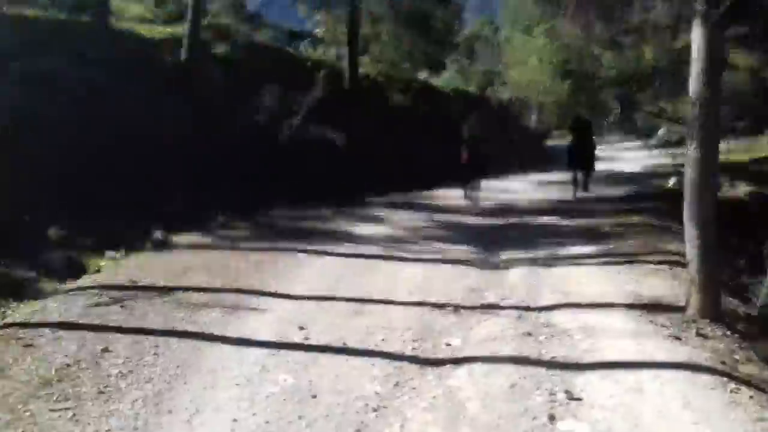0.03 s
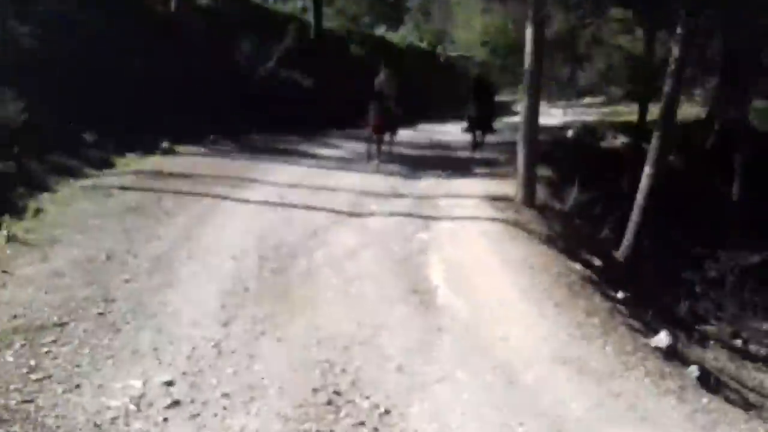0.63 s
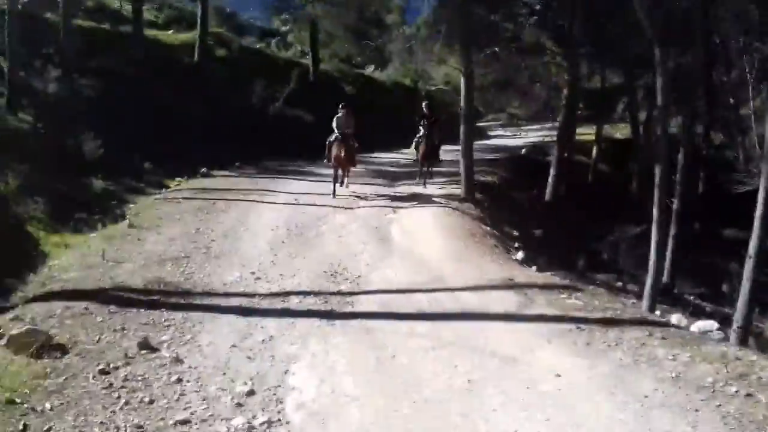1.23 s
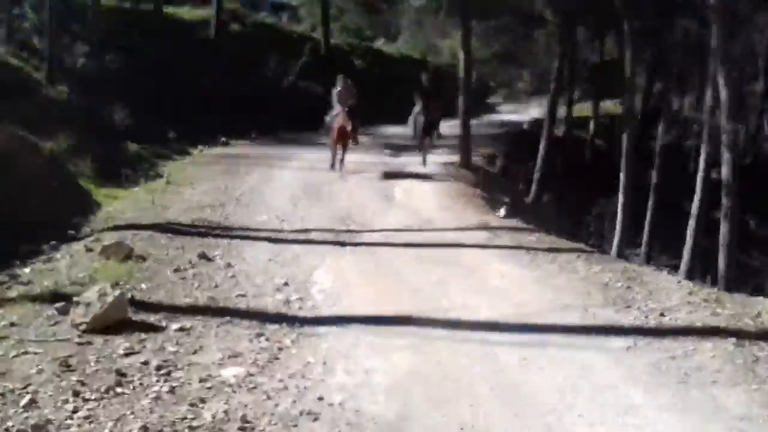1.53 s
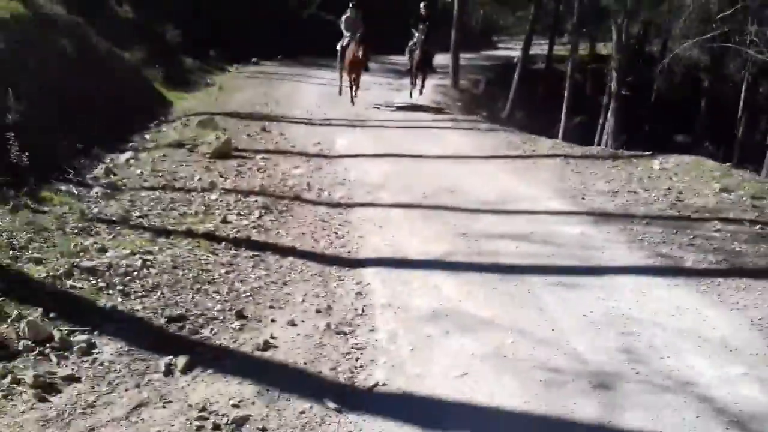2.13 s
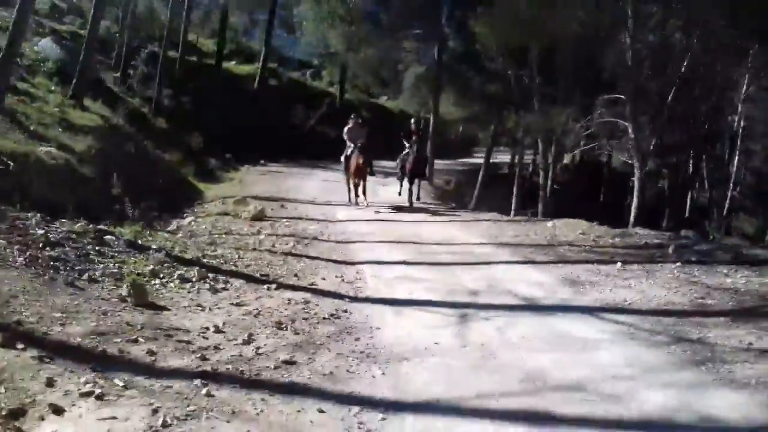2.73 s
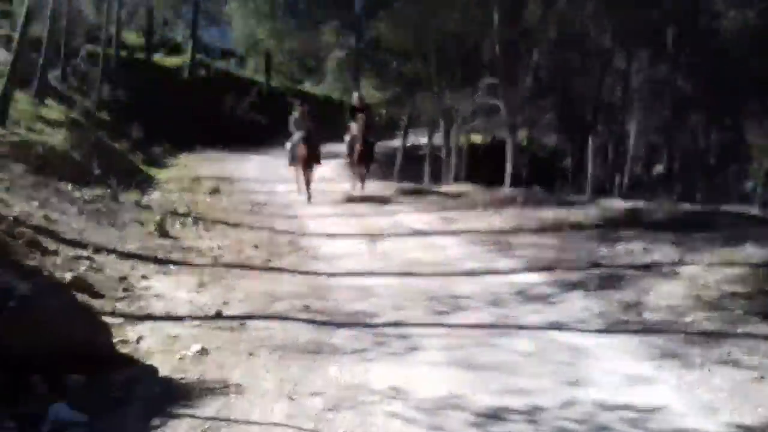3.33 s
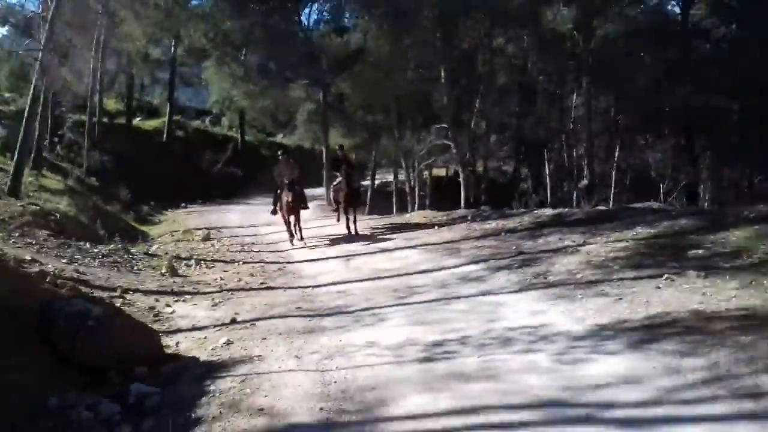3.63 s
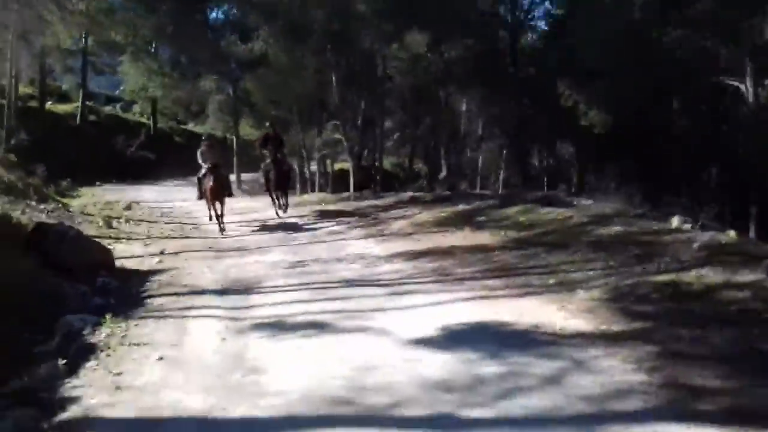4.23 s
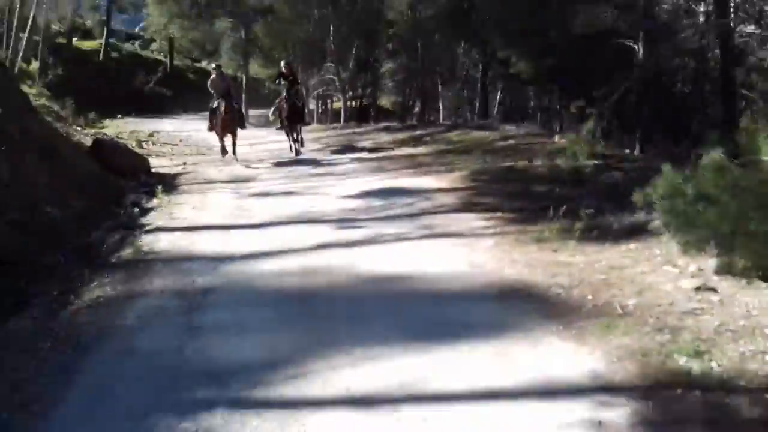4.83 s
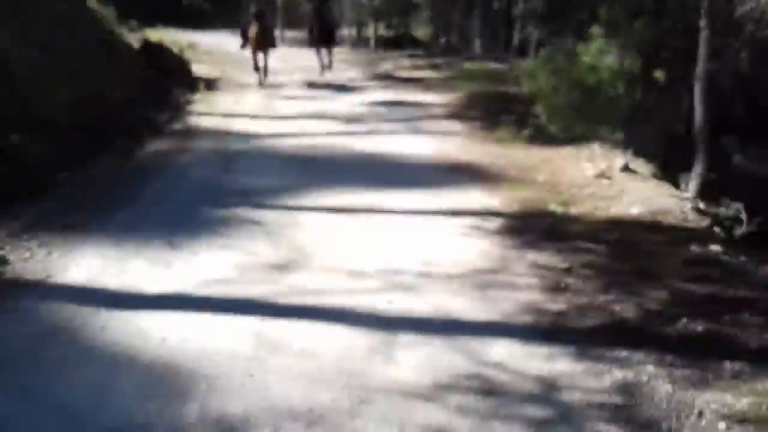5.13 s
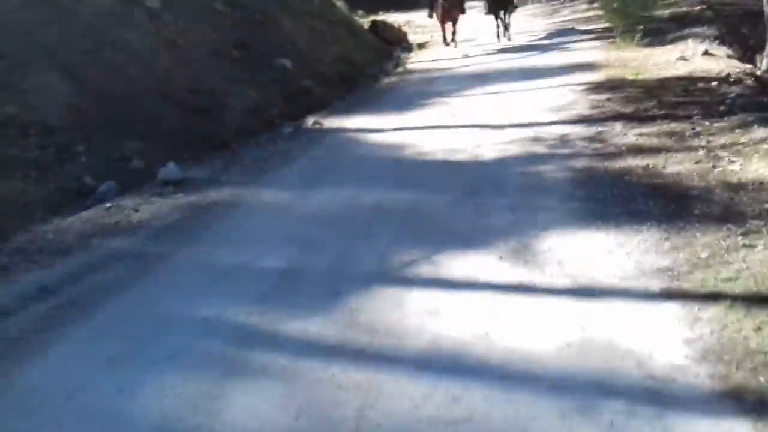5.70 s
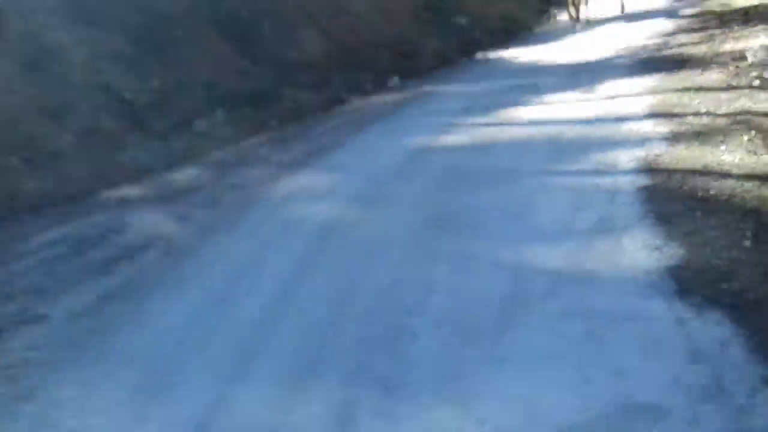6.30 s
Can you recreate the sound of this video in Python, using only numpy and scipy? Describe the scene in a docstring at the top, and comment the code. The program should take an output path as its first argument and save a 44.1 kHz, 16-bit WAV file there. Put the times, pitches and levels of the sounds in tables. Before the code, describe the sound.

Rapid, hollow hoofbeats run from start to finish as horses gallop over gravel, with a faint echo from the surrounding trees. Each stride brings a spray of grit, ticking pebbles and sometimes a brief sandy skid. The microphone rides on the leading horse, picking up low wind rumble, short buffets and a few close clicks. The wind drops near the end while the gallop continues.

```python
"""Gallop on a forest track

Horses on gravel, heard from the saddle of the one in front. Each hoof knocks twice, toe and heel;
some crunch into grit or skid on sand. Every stride throws up gravel, and the trees echo faintly.
The wind of the ride rumbles on the microphone and buffets it with the strides."""
import sys
import numpy as np
from scipy import signal
from scipy.fft import rfft, irfft
from scipy.io import wavfile
from scipy.ndimage import uniform_filter1d, minimum_filter1d

SR = 44100
rng = np.random.default_rng(int(sys.argv[2]) if len(sys.argv) > 2 else 0)


def transcribe(signal):
    """Save signal, clipped to [-1, 1], as a 16-bit WAV file at the path in sys.argv[1]."""
    frames = np.atleast_2d(signal).T
    limited = np.clip(frames, -1, 1)
    pcm = np.round(limited * 32767).astype(np.int16)
    wavfile.write(sys.argv[1], SR, pcm)


N = 289296
TIME_S = np.arange(N) / SR

# Airflow, following the speed of the ride. Each row: time in seconds, relative level in dB.
AIRFLOW = [(0.0, -30), (0.13, -30.5), (2.32, -29.5), (2.89, -30.5), (3.03, -36.5), (3.18, -31.5),
           (3.47, -39.5), (3.91, -32.5), (4.07, -27.5), (4.43, -28), (4.49, -36), (4.55, -27.5),
           (4.97, -20.5), (5.085, -34.5), (5.2, -23), (5.37, -34.5), (5.61, -38), (6.56, -35.5)]
# Gravel sprays, one a stride. Each row: peak time in seconds, level in dB.
SPRAYS = [(.27, -40), (.779, -33), (1.172, -34.5), (1.6, -34.5), (2.071, -35), (2.499, -36.5),
          (2.95, -33.5), (3.35, -35.5), (3.772, -37), (4.23, -37), (4.679, -32.5), (5.14, -37),
          (5.56, -41.5), (5.983, -46), (6.42, -41.5)]
# Stones rolling between sprays. Each row: time in seconds, level in dB.
ROLLING = [(0, -42), (1.3, -42.5), (3.2, -48.5), (4.4, -49), (5.5, -62.5), (6.56, -43.5)]
# Flung stones. Each row: start in seconds, relative level in dB.
PEBBLES = [(0.025, -39.5), (0.137, -29.5), (0.314, -32), (0.34, -40), (0.716, -38.5), (0.865, -33.5),
           (1.285, -39), (1.314, -41), (1.553, -34), (1.626, -40), (1.654, -31), (2.616, -39), (2.752, -38),
           (2.805, -37.5), (2.917, -29), (2.946, -25), (3.084, -34), (3.151, -42), (3.308, -34),
           (3.357, -33), (3.395, -36), (3.514, -39.5), (3.738, -37), (4.173, -34.5), (4.429, -40),
           (4.562, -35.5), (5.006, -34.5), (5.035, -40), (5.297, -38), (5.528, -35), (5.584, -40),
           (5.677, -42.5), (5.873, -42), (5.938, -42), (6.012, -42.5), (6.082, -41), (6.127, -40.5),
           (6.307, -35), (6.408, -33), (6.44, -39)]
# Hoof landings. Each row: start in seconds, relative level in dB, pitch in Hz, ground hardness in dB,
# delay of the lighter edge in seconds (negative if it lands first).
HOOF_FALLS = [(0.057, -24, 1850, 0.5, 0.0064), (0.175, -13.5, 1036, -8, -0.0017),
              (0.2655, -20, 1040, -4, -0.0031), (0.2878, -22.0, 1150, -25, 0.0054),
              (0.4902, -23.0, 1470, -2, -0.00028), (0.577, -24, 1840, -4.5, -0.001),
              (0.621, -17, 1070, -6.5, -0.0021), (0.7059, -21, 1010, -4.5, 0.015),
              (0.9375, -12, 1156, -7, -0.00074), (1.0237, -25.5, 1700, -9, 0.0053),
              (1.059, -15.0, 1040, -5.5, 0.0021), (1.1506, -22, 1100, -3, 0.0017),
              (1.3862, -17.5, 1070, -6, 0.0014), (1.473, -25.0, 1530, -0.5, 0.0053),
              (1.5106, -13, 1276, -12, 0.00097), (1.5985, -19.5, 800, -7, 0.0024),
              (1.6758, -22, 1200, -18, 0.0012), (1.826, -15, 1120, -8, -0.0028),
              (1.9171, -26, 664, 1, 0.0036), (1.9551, -14.5, 1135, -6.0, -0.0022),
              (2.048, -17.5, 960, -5.5, -0.0096), (2.266, -18.5, 1115, -5, 0.0029),
              (2.3648, -23.5, 796, 4, -0.0068), (2.3886, -19.5, 1220, 0.5, -0.00027),
              (2.48, -25, 720, 2, -0.0019), (2.5142, -21.5, 1110, -2.5, -0.0035),
              (2.73, -10.5, 1130, -13.5, 0.00014), (2.817, -20.5, 1530, -7.5, -0.0044),
              (2.8511, -16, 956, -6.5, -0.0041), (3.0619, -20.5, 1044, -5.5, 0.007),
              (3.1832, -15.0, 1220, -10.5, -0.003), (3.2717, -21.0, 1550, -6.5, 0.0031),
              (3.298, -8, 1110, -13, 0.0000035), (3.3999, -19.5, 980, -9.5, -0.0041),
              (3.4227, -19, 1040, -12, 0.0062), (3.6399, -16, 1164, -15.5, 0.002),
              (3.684, -32.5, 1170, 2.5, 0.011), (3.728, -19.5, 1590, -15, 0.0066),
              (3.7605, -16.5, 1000, -11.5, -0.0002), (4.0861, -21, 1150, -5, -0.0017),
              (4.2132, -16, 1145, -12.5, 0.0028), (4.2967, -19.5, 1007, -12, 0.0039),
              (4.529, -18.5, 1080, -6, -0.0013), (4.6077, -20.5, 1730, -3.5, 0.0018),
              (4.6519, -15.5, 1265, -4.5, 0.0011), (4.7435, -17, 1170, -12, 0.0018),
              (4.7736, -18, 700, -7, -0.0042), (4.9698, -18, 903, -9, -0.0056),
              (5.05, -22.5, 1330, -7, -0.00081), (5.0845, -14, 1220, -10, 0.0033),
              (5.181, -17, 1100, -13, 0.000038), (5.1989, -21.5, 1170, -9.5, 0.0029),
              (5.3088, -21, 1080, -9, -0.0054), (5.3505, -24.5, 633, -21, 0.0038),
              (5.4097, -18.0, 1150, -11.5, -0.0019), (5.4941, -18, 975, -9, -0.0048),
              (5.5438, -13.5, 900, -10.5, 0.00026), (5.6255, -24.5, 1170, -8.5, 0.0045),
              (5.8426, -17.5, 1405, -16.5, 0.0025), (5.9282, -22, 1060, -7.5, -0.0077),
              (5.9701, -21.5, 900, -2.5, -0.0036), (6.0508, -27, 1130, -9.5, -0.002),
              (6.2648, -19.0, 1590, -5, 0.0014), (6.3374, -17.0, 1535, -19, 0.0047),
              (6.3829, -16.0, 920, -4, 0.00063), (6.4638, -22.5, 746, -2.5, -0.0013),
              (6.4839, -10, 1050, -9.5, 0.0039), (6.5565, -22.5, 1000, -4, 0.0013)]
# Hoof wall modes. Each row: frequency in Hz, relative level in dB.
WALL_MODES = [(1650, 5.5), (2050, 7), (2400, -10)]
# Hooves biting into grit. Each row: start in seconds, relative level in dB.
BITES = [(0.173, -27), (1.06, -30), (1.149, -24), (1.957, -24), (2.044, -30), (2.156, -26), (2.365, -26.5),
         (2.479, -21.5), (2.816, -30), (2.852, -26.5), (3.304, -24), (3.355, -31.5), (3.851, -25),
         (4.213, -25), (4.297, -32), (4.744, -27.5), (4.966, -33.5), (5.085, -26), (6.336, -35)]
# Close clicks. Each row: start in seconds, dry peak in dB.
CLICKS = [(.18, -8), (0.449, -9.5), (1.352, -21), (5.086, -4.5)]
# Air blasts. Each row: start in seconds, length in seconds, relative level in dB, centre in Hz.
BUFFETS = [(0.22, 0.014, -27.5, 297), (0.309, 0.019, -21.5, 557), (0.612, 0.018, -21, 563),
           (0.648, 0.04, -25.5, 394), (0.861, 0.02, -26, 410), (1.1, 0.0041, -22, 520),
           (1.372, 0.031, -29, 325), (1.453, 0.022, -26, 454), (1.646, 0.0094, -25.5, 470),
           (1.755, 0.024, -21, 166), (1.902, 0.029, -23, 308), (2.361, 0.033, -25, 477),
           (2.501, 0.031, -22, 400), (2.553, 0.012, -23, 292), (2.894, 0.01, -20.5, 313),
           (2.92, 0.04, -19.5, 520), (2.969, 0.019, -23, 250), (3.047, 0.016, -26, 266),
           (3.121, 0.053, -27, 194), (3.138, 0.037, -25.5, 530), (3.432, 0.016, -26.5, 274),
           (3.835, 0.0069, -29, 353), (3.978, 0.024, -25.5, 231), (4.059, 0.025, -24.5, 493),
           (4.126, 0.0038, -22.5, 596), (4.158, 0.011, -25.5, 550), (4.318, 0.03, -22.5, 290),
           (4.358, 0.046, -20.5, 370), (4.54, 0.034, -20, 378), (4.701, 0.028, -28, 200),
           (4.871, 0.0076, -17.5, 455), (4.88, 0.021, -21.5, 427), (4.921, .03, -31, 500),
           (4.963, 0.012, -17, 396), (5.037, 0.0037, -22.5, 440), (5.136, 0.021, -24.5, 586),
           (5.695, 0.011, -36, 450), (5.972, 0.037, -29.5, 202), (6.111, 0.045, -29.5, 186)]
# Skidding hooves. Each row: start in seconds, level in dB.
SKIDS = [(1.52, -42.5), (2.384, -41), (2.497, -41), (3.066, -34), (3.301, -34), (3.395, -35.5),
         (3.858, -40), (4.67, -38.5)]
# Source spectra. Each row: frequency in Hz, relative density in dB.
HISS_SPECTRUM = [(1000, -7), (3200, -6.5), (3900, 3.5), (5000, -20), (9000, -15), (15000, -9.5)]
RUMBLE_SPECTRUM = [(20, -38), (45, -16), (90, 10), (140, 13), (270, 10), (450, 2), (800, -14),
                   (1500, -30.5), (3500, -43), (9000, -56)]
BLAST_SPECTRUM = [(40, -34.5), (130, 2), (320, 17), (540, 15), (950, 6.5), (1600, -6), (3500, -33.5),
                  (9000, -58.5)]
GRIT_SPECTRUM = [(300, -27.5), (700, -1), (1150, 5), (1600, -4), (2200, -4), (3100, -1), (4000, -4.5),
                 (6000, -14), (9000, -23), (15000, -36)]
SAND_SPECTRUM = [(1500, -20), (4500, -2.5), (7200, -0.5), (15000, -15.5)]
# Echo decay of trees and bank. Each row: frequency in Hz, T60 in seconds.
FOREST_T60 = [(300, 0.29), (1200, 0.035), (4000, 0.91), (10000, 0.078)]
# Small microphone. Each row: frequency in Hz, gain in dB.
MIC_RESPONSE = [(15, -37.5), (50, -1), (2400, 2), (3200, -7), (4050, -6.5), (5000, -18.5), (7000, -22.5),
                (10000, -30.5), (15000, -28.5)]


def amp(db):
    return 10 ** (np.asarray(db) / 20)


def unit(x):
    """Scale to rms 1."""
    return x / np.sqrt(np.mean(x ** 2) + 1e-20)


def unit_energy(x):
    """Scale to the energy of 10 ms at rms 1."""
    return x / np.sqrt(np.sum(x ** 2) / (SR // 100))


def at_hz(table, hz):
    """Interpolate over log frequency."""
    table_hz, value = np.transpose(table)
    return np.interp(np.log(hz + 1), np.log(table_hz), value)


def follow(curve):
    """dB curve to gain per sample."""
    return amp(np.interp(TIME_S, *np.transpose(curve)))


def add(mix, start_s, sound):
    part = mix[max(round(start_s * SR), 0):][:len(sound)]
    part += sound[:len(part)]


def colour(x, spectrum, shift=1, size=4096):
    """Minimum-phase filter; shift multiplies the spectrum's frequencies."""
    hz = abs(np.fft.fftfreq(size, 1 / SR))
    log_gain = np.log(amp(at_hz(spectrum, hz / shift)))
    taps = np.fft.ifft(np.exp(signal.hilbert(log_gain).conj())).real[:size // 2]
    return signal.fftconvolve(x, taps)[:len(x)]


def wander(rate_hz):
    """Smooth noise at rms 1, rolled off above rate_hz."""
    hz = np.fft.rfftfreq(N, 1 / SR)
    return unit(irfft(rfft(rng.standard_normal(N)) * np.exp(-(hz / rate_hz) ** 2), N))


def grains(per_s, spread_db):
    """Random impulses, many small, a few large."""
    sizes = amp(spread_db * np.minimum(rng.exponential(1, N), 4))
    return unit(sizes * rng.choice([-1, 1], N) * (rng.random(N) < per_s / SR))


def hiss(level_db=-53):
    """Faint steady hiss."""
    return amp(level_db) * unit(colour(rng.standard_normal(N), HISS_SPECTRUM))


def wind_rumble(gain_db=4, gust_db=1, lump_db=5, flutter_db=-4):
    """Eddies pass the microphone in lumps; brighter flutter grows with the airflow."""
    flow = follow(AIRFLOW) * amp(gust_db * wander(rate_hz=17))
    eddies = unit(colour(rng.standard_normal(N), RUMBLE_SPECTRUM) * amp(lump_db * wander(rate_hz=123)))
    flutter = unit(colour(grains(per_s=320, spread_db=2.5), BLAST_SPECTRUM, shift=1.1))
    return flow * (amp(gain_db) * eddies + amp(flutter_db) * flutter)


def gravel(rise_db_per_s=168, settle_db_per_s=62.5, ticks_db=-5, sand_db=-13, patch_db=6):
    """Each stride throws gravel that patters down and rolls on, with single ticks and patches of sand."""
    power = follow(ROLLING) ** 2
    for peak_s, db in SPRAYS:
        drop_db = np.maximum(rise_db_per_s * (peak_s - TIME_S), settle_db_per_s * (TIME_S - peak_s))
        power += amp(db - drop_db) ** 2
    coarse = unit(colour(grains(per_s=9000, spread_db=3.5), GRIT_SPECTRUM))
    coarse *= amp(2.5 * wander(rate_hz=90))
    ticks = unit(colour(grains(per_s=80, spread_db=2), GRIT_SPECTRUM, shift=1.3))
    sand = unit(colour(grains(per_s=1400, spread_db=2.5), GRIT_SPECTRUM, shift=1.95))
    sand *= amp(sand_db + patch_db * np.tanh(wander(rate_hz=25)))
    return (coarse + amp(ticks_db) * ticks + sand) * np.sqrt(power)


def pebbles(gain_db=3, decay_s=0.0011, centre_hz=2700):
    """Flung stones land with a dry tick, each at its own pitch."""
    out, t = np.zeros(N), np.arange(SR // 50) / SR
    for start_s, db in PEBBLES:
        tick = colour(rng.standard_normal(len(t)) * np.exp(-t / decay_s), GRIT_SPECTRUM)
        resonance = signal.iirpeak(centre_hz * rng.uniform(.7, 1.35), Q=1.5, fs=SR)
        add(out, start_s, amp(db + gain_db) * unit_energy(signal.lfilter(*resonance, tick)))
    return out


def forest_echo(x, level_db=-21, reflections=1500):
    """Trunks and bank scatter the sound; decay time varies with frequency."""
    taps = np.zeros(SR // 2)
    taps[rng.integers(SR // 150, len(taps), reflections)] = rng.standard_normal(reflections)
    hz, t, spectra = signal.stft(taps, SR, nperseg=256)
    decay = amp(-60 * t / at_hz(FOREST_T60, hz)[:, None])
    tail = signal.istft(spectra * decay, SR, nperseg=256)[1]
    return amp(level_db) * signal.fftconvolve(x, tail / np.linalg.norm(tail))[:N]


def clop(t, hz, swell_cycles=1.294, rebound=0.36, rebound_s=0.004):
    """Air trapped under the sole swells into a hollow note, and again faintly as the hoof settles."""
    swell_s = swell_cycles / hz
    onsets_s = np.array([[0], [rebound_s * rng.uniform(.6, 1.4)]])
    age = np.maximum(t - onsets_s, 0) / swell_s
    first, second = (age * np.exp(1 - age)) ** 3 * np.cos(2 * np.pi * hz * (t - swell_s))
    return unit_energy(first + rebound * second)


def hoof_edge(t, hz, hard_db, wall_db=-1, wall_t60_s=0.016, shoe_db=-7, shoe_hz=3850,
              scuff=0.11, scuff_s=0.0063, crack_db=-10, crack_s=0.0022):
    """One edge lands: sole clops, dirt cracks; on hard ground the wall rings and the iron shoe ticks."""
    force = scuff * rng.standard_normal(len(t)) * np.exp(-t / scuff_s)
    force[SR // 1400] += 1  # impact
    mode_hz, mode_db = np.transpose(WALL_MODES)[..., None]
    vary_db = rng.normal(0, 3, mode_hz.shape)
    detune = rng.normal(1, .06, mode_hz.shape)
    modes = amp(mode_db + vary_db - 60 * t / wall_t60_s) * np.cos(2 * np.pi * mode_hz * detune * t)
    wall = unit_energy(signal.fftconvolve(force, modes.sum(0))[:len(t)])
    shoe_resonance = signal.iirpeak(shoe_hz * np.sqrt(detune[0, 0]), Q=6, fs=SR)
    shoe = unit_energy(signal.lfilter(*shoe_resonance, force))
    crack = unit_energy(colour(rng.standard_normal(len(t)) * np.exp(-t / crack_s), GRIT_SPECTRUM))
    ring = amp(wall_db) * wall + amp(shoe_db) * shoe
    return clop(t, hz) + amp(crack_db) * crack + amp(hard_db) * ring


def hoof_knocks(gain_db=-2.51, light_ratio=0.61, dirt_cutoff_hz=7500):
    """Toe and heel land in turn, one firm, one lighter at its own pitch; dirt softens both."""
    out, t = np.zeros(N), np.arange(SR // 20) / SR
    for start_s, db, hz, hard_db, delay_s in HOOF_FALLS:
        gain = amp(db + gain_db)
        add(out, start_s, gain * hoof_edge(t, hz, hard_db))
        light_hz = hz * rng.uniform(.85, 1.2)
        add(out, start_s + delay_s, light_ratio * gain * hoof_edge(t, light_hz, hard_db))
    return signal.lfilter(*signal.butter(2, dirt_cutoff_hz, fs=SR), out)


def crunch(gain_db=9, rise_s=0.0052, crack=1.83, crack_s=0.01, scatter=0.52, scatter_s=0.025):
    """Grit cracks as a hoof bites in, then scatters briefly."""
    force, t = np.zeros(N), np.arange(SR // 4) / SR
    rise = 1 - np.exp(-t / rise_s)
    fade = crack * np.exp(-t / crack_s) + scatter * np.exp(-t / scatter_s)
    for start_s, db in BITES:
        add(force, start_s, amp(db) * rise * fade)
    return amp(gain_db) * colour(force * grains(per_s=9000, spread_db=3.5), GRIT_SPECTRUM)


def clicks():
    """Sharp, bright clicks beside the microphone."""
    out = np.zeros(N)
    click = colour(signal.unit_impulse(SR // 100), SAND_SPECTRUM)
    for start_s, db in CLICKS:
        add(out, start_s, amp(db) * click / abs(click).max())
    return out


def wind_buffets(gain_db=4.5, lump_db=3.5, spectrum_centre_hz=460, margin_s=0.00353,
                 thump=1.2, thump_cycles=0.92):
    """The microphone swings through the air with the strides: short blasts, each with a thumping core."""
    out = np.zeros(N)
    lumps = amp(lump_db * wander(rate_hz=690))
    for start_s, length_s, db, hz in BUFFETS:
        count = int((length_s + 2 * margin_s) * SR)
        air = colour(rng.standard_normal(SR // 2), BLAST_SPECTRUM, hz / spectrum_centre_hz)[-count:]
        air *= lumps[int(start_s * SR):][:count] * signal.windows.tukey(count, .5)
        cycles = hz * (np.arange(count) - count / 2) / SR
        core = thump * np.exp(-(cycles / thump_cycles) ** 2) * np.sin(2 * np.pi * cycles)
        add(out, start_s - margin_s, amp(db + gain_db) * unit(unit(air) + core))
    return out


def skids(rise_s=0.012):
    """A skidding hoof throws a short, grainy hiss of sand."""
    out, t = np.zeros(N), np.arange(SR // 8) / SR
    envelope = t / rise_s * np.exp(1 - t / rise_s)
    for start_s, db in SKIDS:
        sand = unit(colour(grains(per_s=5000, spread_db=2)[:len(t)], SAND_SPECTRUM))
        add(out, start_s, amp(db) * sand * envelope)
    return out


def scene():
    """Hooves and their echo, plus gravel, hiss and wind; mono."""
    horses = hoof_knocks() + crunch() + pebbles() + clicks() + skids()
    return (horses + forest_echo(horses) + gravel() + hiss() + wind_rumble() + wind_buffets())[None]


def record(dry, ceiling=0.94, limiter_samples=100, cutoff_hz=15900):
    """Dull microphone, fast peak limiter, band limit."""
    heard = colour(dry[0], MIC_RESPONSE)
    needed_gain = np.minimum(1, ceiling / (abs(heard) + 1e-9))
    gain = uniform_filter1d(minimum_filter1d(needed_gain, limiter_samples), limiter_samples)
    lowpass = signal.firwin(511, cutoff_hz, window=("kaiser", 9), fs=SR)
    return signal.oaconvolve(heard * gain, lowpass, "same")[None]


dry = scene()
out = record(dry)
transcribe(out)
```